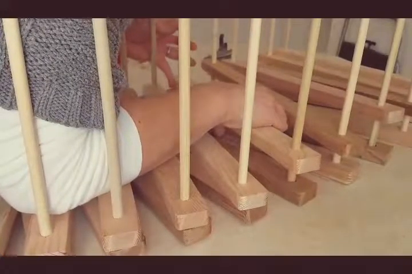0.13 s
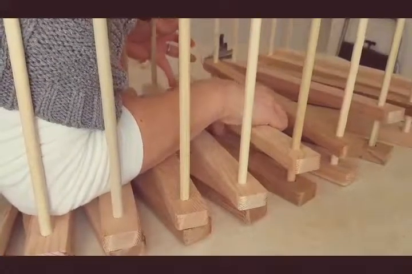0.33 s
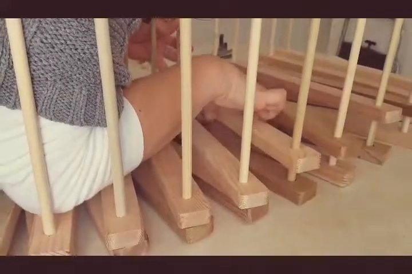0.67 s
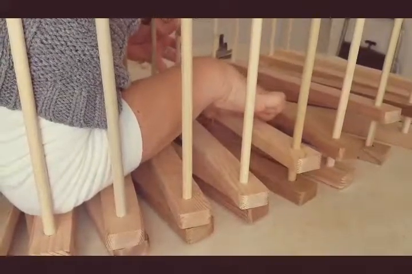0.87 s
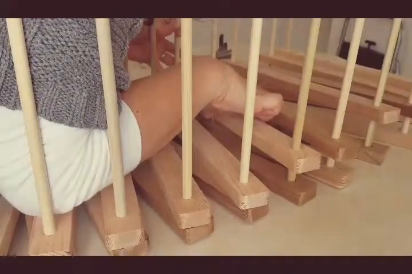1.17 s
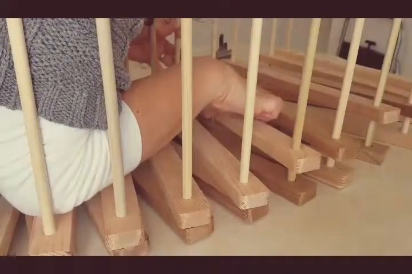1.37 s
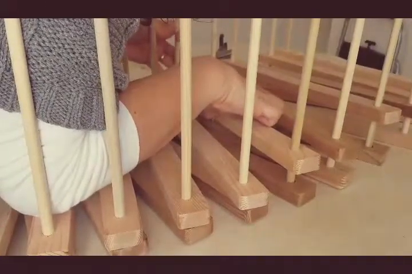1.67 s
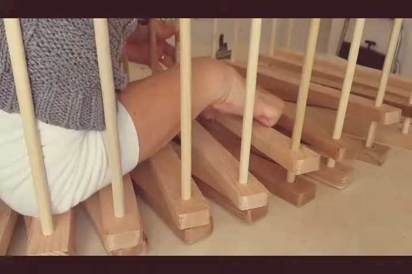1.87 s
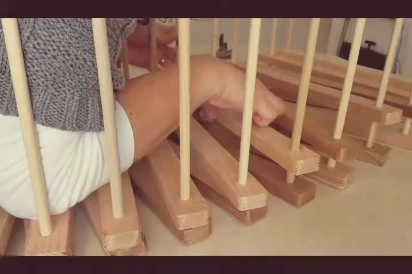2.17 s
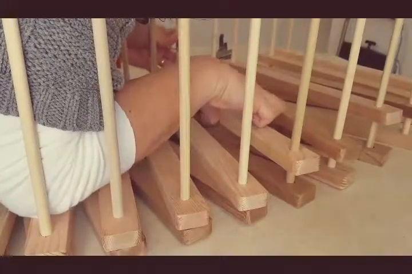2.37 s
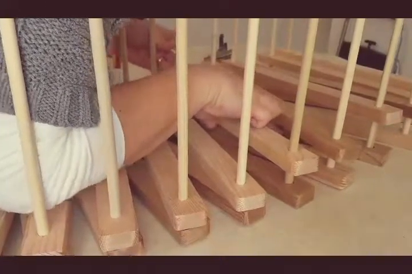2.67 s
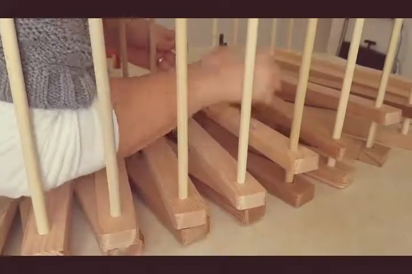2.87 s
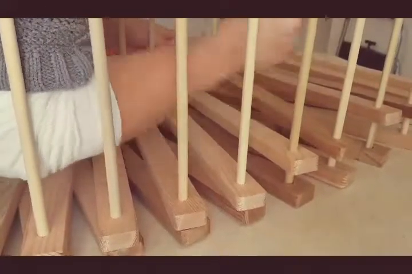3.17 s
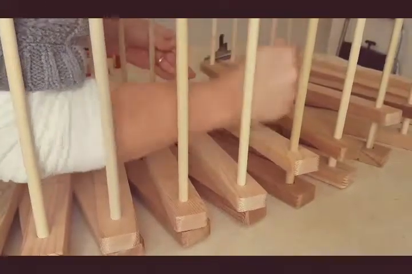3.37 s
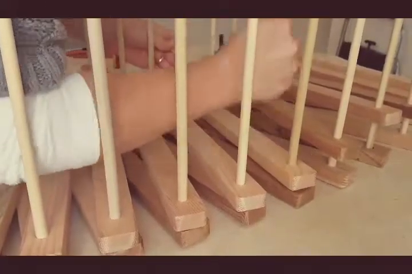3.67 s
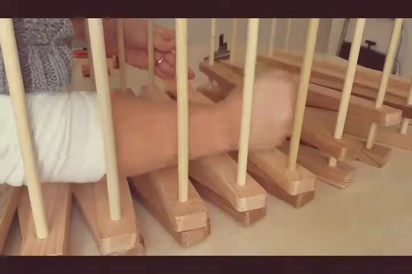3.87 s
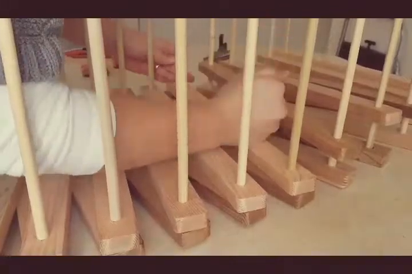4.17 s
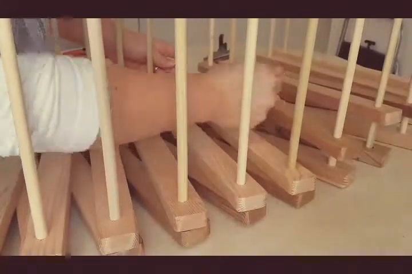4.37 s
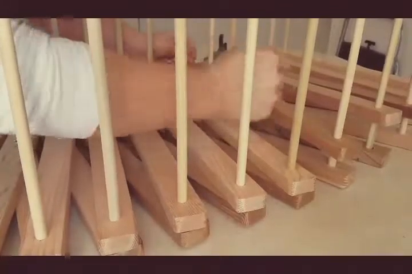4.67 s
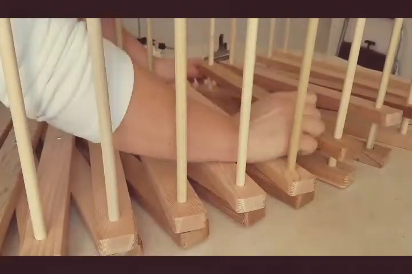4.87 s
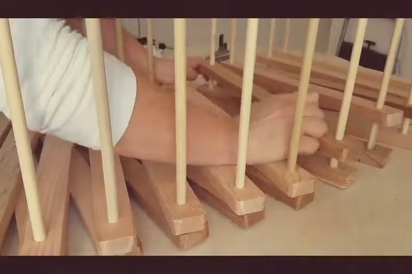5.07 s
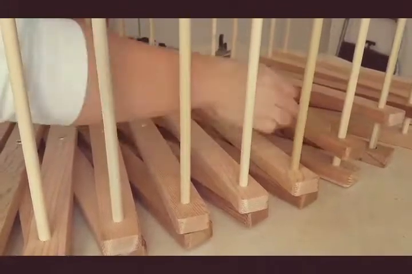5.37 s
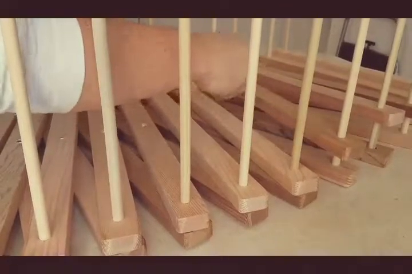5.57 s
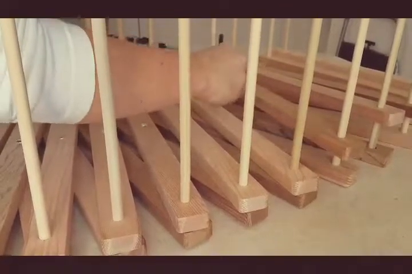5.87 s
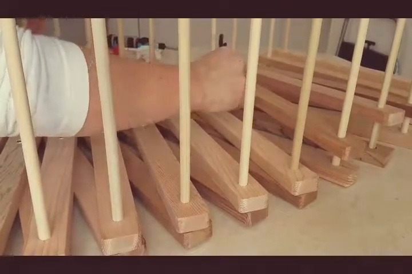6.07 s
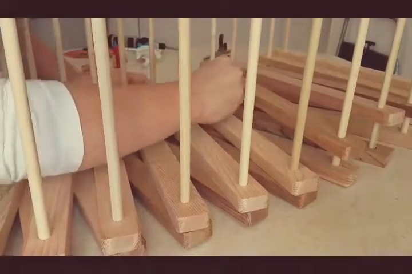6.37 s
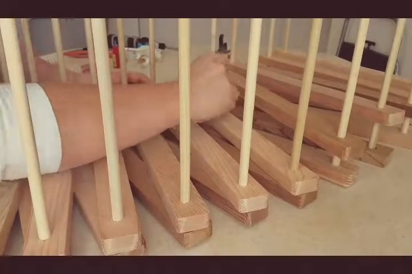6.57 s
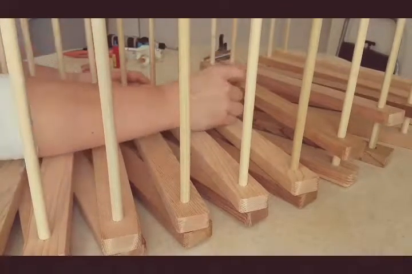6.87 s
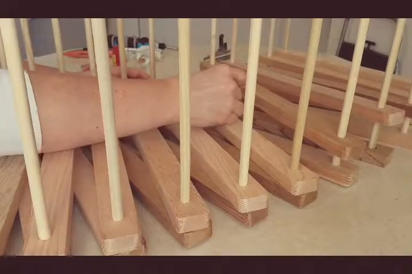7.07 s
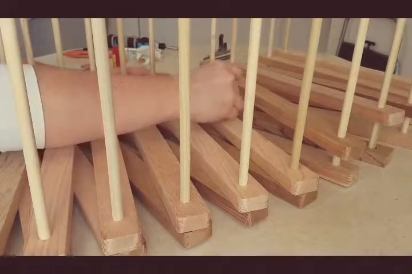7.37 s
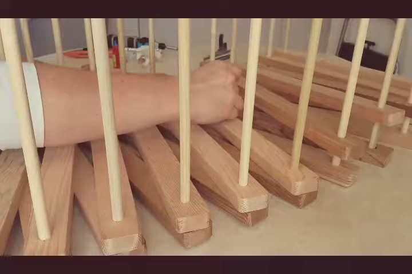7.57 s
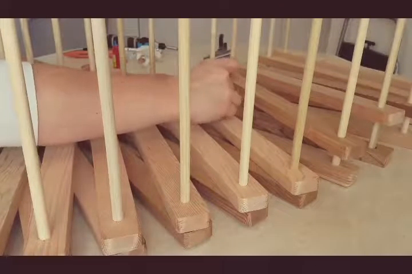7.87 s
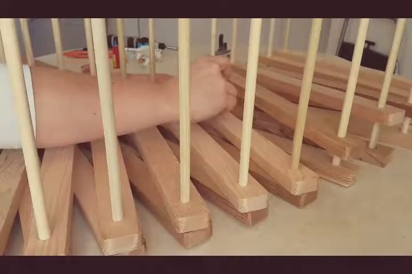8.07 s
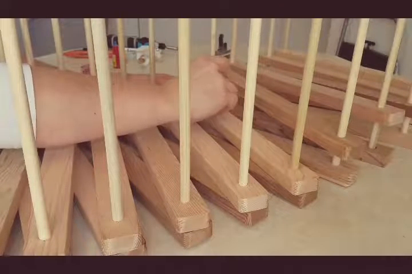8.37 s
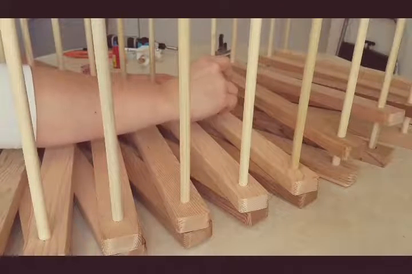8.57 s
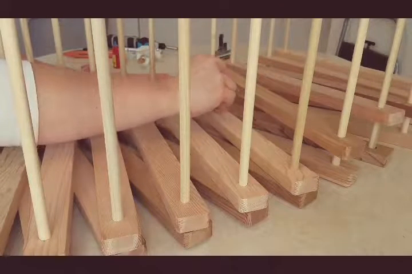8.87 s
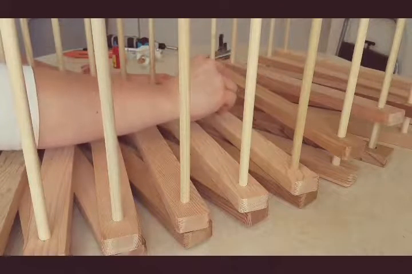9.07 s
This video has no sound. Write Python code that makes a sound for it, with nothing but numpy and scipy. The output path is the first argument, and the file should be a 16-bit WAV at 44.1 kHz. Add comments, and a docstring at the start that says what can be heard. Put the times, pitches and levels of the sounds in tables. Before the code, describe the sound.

Close stereo pickup of a wooden rack on a bench indoors. Quiet handling comes first: small metallic ticks, soft woody knocks, a short dry squeak and a faint sleeve brush. A run of five hard wooden clacks, about a quarter second apart, leaps far above everything else and rings shortly in the room. Afterwards come a muted knock pair, little ticks, a low sliding rub, scuffs and sparse dowel taps over faint hum.

```python
"""Wooden rack on the bench

Metal fittings click, a joint creaks, five arms drop in a run of clacks; light knocks come before and
after the clacks, and taps and a slide come late.
Blows are a bright snap and a noise crack that excite wood or metal modes and dense room reflections.
The creak is a squeak of unsteady sines; hands, sleeve, scuffs and slide are grainy, coloured friction noise.
Underneath lie steady still-air noise and a faint two-tone hum, in a small, live workshop."""
import sys
import numpy as np
from scipy import signal
from scipy.fft import rfft, irfft, next_fast_len
from scipy.io import wavfile
from scipy.ndimage import uniform_filter1d

SR = 44100
rng = np.random.default_rng(int(sys.argv[2]) if len(sys.argv) > 2 else 0)


def wav_record(signal):
    """Record a signal, one row per channel, as 16-bit PCM in the file named by sys.argv[1]."""
    frames = np.transpose(np.atleast_2d(signal))
    bounded = np.clip(frames, -1, 1)
    # unit amplitude maps onto the largest positive 16-bit level
    quanta = np.round(bounded * 32767).astype(np.int16)
    wavfile.write(sys.argv[1], SR, quanta)


N = 406602
TIME = np.arange(N) / SR   # seconds
BLOW_SIZE = 24576          # samples given to each blow and its tail

# Event levels and note levels are mix settings, before the trims that the source functions add.
# Bass, presence, treble, brightness and note are relative to the event's level.
# Arms dropping on the stack: [t/s, level/dB, bass/dB, presence/dB, treble/dB, contact sharpness/dB,
# the part's own note f/Hz, note/dB]
CLACK_EVENTS = [(3.5425, -7, -2.5, -2, -5.5, 6.5, 797, -7.5), (3.8012, -6, -6, -3, -9.5, 6.5, 654, -3.5),
                (4.0248, -7.5, -2, -1.5, -5.5, 4.5, 651, -5.5),
                (4.3088, -9.5, -6.5, 5.5, 4.5, 5, 2235, -11.5),
                (4.6195, -15.5, 1.5, -1.5, -10.5, 3.5, 764, -3)]
# Metal fittings touching: [t/s, level/dB, bass/dB, presence/dB, treble/dB, sharpness/dB, note f/Hz, note/dB]
CLICK_EVENTS = [(0.0354, -51, 8, 7.5, 8, 8, 806, -6), (0.1252, -35.5, 4, -5, -9, 2.5, 2200, -13),
                (0.1541, -51.5, 7, 8, 11.5, 9.5, 627, -4), (0.6345, -42, -16, 3, 11, 6.5, 1184, 1.5),
                (0.7897, -40, -16, 2, 8, 9.5, 1190, 1), (1.0845, -34.5, -7, 0.5, 1, 6.5, 750, -18),
                (1.1624, -36.5, -22, 0.5, -1, 4.5, 1183, -0.5), (1.176, -39, -6, -6, 1, 12, 947, -2),
                (1.2995, -34, -15, -4, -4, 8, 1350, -8.5), (2.0269, -35.5, -18, 3.5, -10.5, 4, 726, -8.5),
                (2.0858, -47, 3, 4, 10, 11.5, 931, 5.5), (2.8999, -32, -22, -3.5, -3.5, 7.5, 958, -8),
                (2.9592, -34, 13.5, 3.5, 6.5, 8, 2290, -7), (3.3334, -36.5, -7, -1, -5, 4.5, 737, -4),
                (5.7105, -39.5, 9.5, 0, -12.5, 8, 1250, -2)]
# Arms bumping lightly together: [t/s, level/dB, bass/dB, brightness/dB, sharpness/dB, the arm's note f/Hz]
KNOCK_EVENTS = [(0.3048, -49.5, 6, 8.5, 5.5, 980), (0.715, -44, -12, 11, 0, 1195),
                (1.2873, -45, -11, 2, 6, 343), (1.328, -38.5, -11, 5.5, 9.5, 747),
                (1.5148, -48, 3.5, 0.5, 5.5, 660), (1.9219, -40.5, -5, -2.5, 2.5, 352),
                (1.98, -42.5, -1, -4.5, 7, 362), (2.06, -38, -8, 7, 4.5, 1760),
                (2.4429, -37, 1.5, -3.5, 4, 335), (2.7282, -36.5, -7.5, -11, 6, 340),
                (2.872, -36.5, -1, -3, 4, 297), (3.058, -32, -2, -2, 5, 636),
                (3.2768, -42.5, 1, 6, 4.5, 2250), (4.613, -32.5, 0, -2, 9.5, 570),
                (5.3352, -23, 0, -12, 5, 842), (5.362, -30.5, 3, -6.5, 5, 624),
                (5.468, -45.5, 2, -2, 9.5, 352), (5.808, -43.5, 7.5, -13, 3, 210)]
# A dowel tapped against an arm: [t/s, level/dB, bass/dB, brightness/dB, sharpness/dB]
TAP_EVENTS = [(5.941, -44, 1, -9, 5), (5.984, -47, 0.5, -4, 3), (7.9, -56, 3, 1, -4.5),
              (8.352, -59, -2, -8, 9), (8.6239, -45.5, -9, 5, 7.5), (8.8172, -48, -15, 6, 4),
              (8.8627, -42, -1, 6, 6), (8.9901, -53, -5, -7.5, 11.5)]
# Spectrum of a clack: [f/Hz, relative level/dB]
CLACK_SPECTRUM = [(40, -23), (65, -15), (95, -6), (130, -4.5), (200, -8), (500, -5.5), (750, -8),
                  (1100, -11.5), (1600, -16), (2300, -19), (3200, -29.5), (5000, -34), (7500, -42.5),
                  (10000, -40.5), (14500, -51.5)]
# Spectrum of a click: [f/Hz, relative level/dB]
CLICK_SPECTRUM = [(50, -16.5), (110, -1), (280, -5.5), (600, -5), (1200, -6.5), (2300, -4.5), (3200, -13),
                  (4200, -13.5), (7000, -22.5), (9500, -14), (14500, -19.5)]
# Spectrum of a knock: [f/Hz, relative level/dB]
KNOCK_SPECTRUM = [(40, -19.5), (70, -9), (115, -4.5), (190, -7.5), (280, 1.5), (450, -20.5), (700, -10.5),
                  (1200, -13), (2300, -18.5), (3500, -30), (7000, -35.5), (14500, -34)]
# Spectrum of a tap: [f/Hz, relative level/dB]
TAP_SPECTRUM = [(50, -4), (120, 2.5), (300, 1.5), (450, -11), (680, -1), (950, -10), (1600, -10),
                (2400, -11.5), (3700, -19.5), (6000, -27.5), (8000, -30.5), (14500, -29.5)]
# Modes of the wooden rack: [f/Hz, relative level/dB, t60/s]
WOOD_MODES = [(94.6, -2.5, .35), (111, 0.5, 0.15), (127.3, 5.5, 0.35), (162, -4.5, 0.32), (205, -4.5, 0.55),
              (261.6, 0, 0.45), (343, -1, 0.26), (379, -9.5, 0.14), (487, -2.5, 0.42), (540, 2, 0.28),
              (640, 0, 0.33), (792, -1, 0.18), (970, -6.5, 0.23), (1294, -14.5, .3), (1737, -16.5, 0.5),
              (1797, -16, 0.47), (2092, -15.5, 0.25), (2208, -15.5, .35), (2380, -15, 0.36)]
# Modes of the metal fittings: [f/Hz, relative level/dB, t60/s]
METAL_MODES = [(1224, -2.5, 0.3), (1790, -4.5, .3), (2347, -2, .3), (2560, -4, .22), (3200, -9.5, .22),
               (3960, -6, .18), (4410, -14, .18), (5550, -16.5, .28), (6770, -13, 0.15), (9000, -14, 0.34),
               (9340, -8, 0.17), (11730, -6.5, 0.1), (13150, -3, .15)]
# Squeaks of a tight joint, mere ticks when the slip is brief: [t/s, length/s, level/dB, pitch f/Hz]
CREAK_EVENTS = [(0.952, .021, -38.5, 761), (.976, .052, -27, 735), (1.026, 0.046, -34.5, 731),
                (1.069, 0.0195, -28, 779), (2.939, .008, -40, 2300), (3.053, 0.0063, -39, 2386),
                (3.276, .006, -42, 2200), (6.012, 0.0052, -42, 319.2), (6.123, .004, -45, 328),
                (6.168, 0.0064, -49.5, 670), (6.225, 0.0062, -51, 300), (6.339, 0.01, -47.5, 326)]
# Partials of the squeak: [multiple of the pitch, relative level/dB]
SQUEAK_PARTIALS = [(.35, -16.5), (1, -2), (1.5, -18.5), (2.2, -35), (2.9, -23)]
# One arm pushed along another: [t/s, length/s, level/dB]
SLIDE_SHOVES = [(6.908, .03, -45.5), (7.012, 0.011, -40.5), (7.09, 0.046, -40.5)]
# Spectrum of the sliding rumble: [f/Hz, relative level/dB]
SLIDE_SPECTRUM = [(30, -15), (76, -31), (128, -8), (160, -12), (193, 0.5), (263, -16.5), (359, -8.5),
                  (465, -12.5), (602, -10.5), (888, -16.5), (1830, -22.5), (4300, -38), (7000, -56),
                  (14500, -60)]
# A hand gripping and shifting the arms: [t/s, length/s, level/dB]
HAND_GRIPS = [(.02, 0.15, -41.5), (.41, 0.079, -48.5), (.565, 0.04, -47), (.65, 0.71, -52.5),
              (1.53, 0.14, -62), (1.96, 0.14, -46), (2.45, 0.45, -52.5), (2.88, 0.26, -42.5),
              (3.28, 0.1, -47), (4.88, 0.19, -53), (5.37, 0.26, -46.5), (5.76, 0.042, -42.5),
              (5.93, 0.32, -59), (7.6, 1.3, -65.5)]
# Spectrum of a hand rubbing along the arms: [f/Hz, relative level/dB]
HAND_SPECTRUM = [(24, -47), (40, -18.5), (80, -9.5), (118, 2), (180, -9.5), (267, -0.5), (416, -18.5),
                 (810, -13), (1060, -22.5), (2340, -25), (3140, -35.5), (14500, -45)]
# Wood scuffing lightly over wood: [t/s, length/s, level/dB]
WOOD_SCUFFS = [(2.71, 0.16, -54.5), (5.3, .03, -49), (7.543, 0.016, -54), (8.06, 0.057, -61.5),
               (8.25, 0.017, -58.5), (8.415, 0.05, -55.5), (8.59, .02, -62)]
# Spectrum of a scuff: [f/Hz, relative level/dB]
SCUFF_SPECTRUM = [(80, -20), (300, 0.5), (450, -3.5), (680, -2.5), (1000, -9), (2400, -9.5), (4000, -19.5),
                  (7000, -34), (14500, -32)]
# A knitted sleeve brushing past the dowels: [t/s, length/s, level/dB]
SLEEVE_BRUSHES = [(2.46, 0.11, -60), (2.9, 0.59, -61), (3.7, 0.074, -58), (5.29, 0.064, -60),
                  (5.7, 0.034, -60.5), (7.79, 0.041, -63)]
# Spectrum of the sleeve, also used for the hiss of the slide: [f/Hz, relative level/dB]
HISS_SPECTRUM = [(100, -21), (1000, -1), (2400, 1), (4000, -2.5), (7000, -8), (9500, -6.5), (14500, -8)]
# Still air of the workshop: [f/Hz, relative level/dB]
AIR_SPECTRUM = [(20, -7.5), (33, -18.5), (80, -17), (130, -9), (190, -14.5), (270, -11.5), (400, -19),
                (520, -16), (950, -20.5), (1500, -23), (2400, -23.5), (4000, -30.5), (7300, -38),
                (9500, -35), (14500, -34.5)]
# Tones of the hum: [f/Hz, rms level/dB]
HUM_TONES = [(124, -73.5), (204.6, -81.5)]
# The room's reflections: [centre f/Hz, t60/s, relative level/dB]
ROOM_BANDS = [(110, .38, 0.5), (258, 0.33, 0.5), (550, 0.36, -0.5), (1090, 0.39, -.5), (2200, .38, -1.5),
              (4200, 0.33, 2), (7000, .32, 2), (13000, .25, 2.5)]
# Left-right likeness at the two microphones: [f/Hz, correlation before limiting to +-0.99]
MIC_LIKENESS = [(120, 1.1), (300, 0.84), (700, 0.73), (1300, -0.0249), (14000, -0.01)]
# Colour difference of the two microphones: [f/Hz, left minus right/dB]
MIC_BALANCE = [(100, -2.5), (600, -2.5), (1100, 0.05), (2200, 2), (8000, .5)]


def clacks():
    """Heavy arms drop on the stack and set the rack's wood ringing."""
    return blows(CLACK_EVENTS, CLACK_SPECTRUM, WOOD_MODES, snap_db=15, tail_db=-1.5, ring_db=-11.5,
                 note_db=-0.5, note_t60=0.13, crack_db=2.5, crack_s=0.00093, build_s=0.0022,
                 spread_db=4.0, ripple_db=2, valley_db=0)


def clicks():
    """Small metal fittings touch and ring in their own higher modes."""
    return blows(CLICK_EVENTS, CLICK_SPECTRUM, METAL_MODES, snap_db=12, tail_db=-1.4, ring_db=-9,
                 note_db=3.5, note_t60=0.2, crack_db=2.0, crack_s=0.0018, build_s=0.0032,
                 spread_db=2.5, ripple_db=4, valley_db=1)


def knocks():
    """Arms bump lightly; each rings its own note, and the treble follows the brightness."""
    events = []
    for start_s, level_db, bass_db, bright_db, sharp_db, note_hz in KNOCK_EVENTS:
        treble_db = bright_db - 5
        events.append((start_s, level_db, bass_db, bright_db, treble_db, sharp_db, note_hz, -5))
    return blows(events, KNOCK_SPECTRUM, WOOD_MODES, snap_db=13.5, tail_db=-2.5, ring_db=-17,
                 note_db=-1.5, note_t60=0.13, crack_db=2.5, crack_s=0.0031, build_s=0.0026,
                 spread_db=4, ripple_db=5, valley_db=-2.5)


def taps():
    """A dowel taps an arm; every tap shares its note, and brightness sets presence and treble."""
    dowel_hz, dowel_db = 638.6, 2
    events = []
    for start_s, level_db, bass_db, bright_db, sharp_db in TAP_EVENTS:
        treble_db = 1.96 * bright_db   # treble swings further than presence
        events.append((start_s, level_db, bass_db, bright_db, treble_db, sharp_db, dowel_hz, dowel_db))
    return blows(events, TAP_SPECTRUM, WOOD_MODES, snap_db=16, tail_db=-1.0, ring_db=-13.5,
                 note_db=5.0, note_t60=0.076, crack_db=2.0, crack_s=0.005, build_s=0.0015,
                 spread_db=3.0, ripple_db=5, valley_db=3.0)


def blows(events, colour, modes, snap_db, tail_db, ring_db, note_db, note_t60, crack_db, crack_s,
          build_s, spread_db, ripple_db, valley_db):
    """Each blow is a short crack, then the part's modes and the room's reflections."""
    out, hz, t = np.zeros((2, N)), bins_hz(BLOW_SIZE), TIME[:BLOW_SIZE]
    body = unit_gain(colour, hz) * modal_emphasis(modes, width_hz=11.0, valley_db=valley_db)
    snap = contact_snap(level_db=snap_db, edge_hz=3200, delay_s=0.0006)
    for start_s, level_db, bass_db, presence_db, treble_db, sharp_db, own_hz, own_db in events:
        tone = [(170, bass_db), (400, 0.01), (800, 0.0),
                (1600, presence_db), (2800, presence_db), (6500, treble_db)]
        # A soft contact swells more slowly
        build = 1 - np.exp(-t / (build_s * from_db(-2 * sharp_db)))
        crack = rms_one(irfft(diffuse(BLOW_SIZE))) * np.exp(-t / crack_s)
        crack = crack * from_db(crack_db + sharp_db)
        tail = from_db(tail_db) * room_tail(swell_cycles=0.81)
        burst = build * (crack + tail) + from_db(sharp_db) * snap
        gain = body * from_db(at_hz(tone, hz)) * contact_ripple(ripple_db, width_hz=76)
        struck = causal_filter(burst, gain)
        shared_ring = from_db(ring_db) * ringing(modes, tone, spread_db)
        own_note = ringing([(own_hz, own_db + note_db, note_t60)], [(own_hz, 0)], 0)
        add(out, start_s, from_db(level_db) * (struck + build * (shared_ring + own_note)))
    return out


def contact_snap(level_db, edge_hz, delay_s):
    """Hard surfaces meeting send one bright spike straight to the microphones."""
    spike = signal.unit_impulse(BLOW_SIZE, int(delay_s * SR))
    treble_only = signal.butter(1, edge_hz, "high", fs=SR, output="sos")
    return from_db(level_db) * signal.sosfilt(treble_only, spike)


def modal_emphasis(modes, width_hz, valley_db):
    """Vibration gathers at the modes and is weak between; power is levelled against its local mean."""
    hz = bins_hz(BLOW_SIZE)
    power = from_db(2 * valley_db)
    for centre_hz, _, _ in modes:
        power = power + 1 / (1 + ((hz - centre_hz) / width_hz) ** 2)
    return np.sqrt(power / uniform_filter1d(power, size=151))


def contact_ripple(depth_db, width_hz):
    """Each point of contact favours some of the part's many upper resonances and misses others."""
    hz = bins_hz(BLOW_SIZE)
    knots_hz = np.arange(600) * width_hz
    ripple = np.interp(hz, knots_hz, rng.standard_normal(len(knots_hz)))
    return rms_one(from_db(depth_db * ripple * hz / (hz + 500)))   # shallow in the bass


def ringing(modes, tone, spread_db):
    """Decaying sines, struck anew in strength; high ones reach the two microphones out of step."""
    hz, db, t60 = np.transpose(modes)
    strength, phase, lag = rng.standard_normal((3, len(hz)))
    apart = lag * np.arccos(np.clip(at_hz(MIC_LIKENESS, hz), 0, 1)) / 2
    gain = from_db(db + at_hz(tone, hz) + spread_db * strength)
    start = gain * np.exp(1j * (np.pi * phase + apart * [[1], [-1]]))
    waves = np.exp(np.outer(2j * np.pi * hz - np.log(1000) / t60, TIME[:BLOW_SIZE]))
    return np.imag(start @ waves)


def room_tail(swell_cycles):
    """Dense reflections: each range of pitch builds over a few cycles and dies at its own rate."""
    field, hz, t = diffuse(BLOW_SIZE), bins_hz(BLOW_SIZE), TIME[:BLOW_SIZE]
    centres_hz = np.array(ROOM_BANDS)[:, 0]
    out = 0
    for one_band, (centre_hz, t60, db) in zip(np.eye(len(ROOM_BANDS)), ROOM_BANDS):
        share = at_hz(np.c_[centres_hz, one_band], hz)   # neighbouring ranges crossfade
        swell = 1 - np.exp(-t * centre_hz / swell_cycles)
        decay = np.exp(-np.log(1000) * t / t60) * swell
        # Each range returns a set share of the blow's energy
        power = np.mean(share ** 2) * np.mean(decay ** 2)
        out = out + from_db(db) * np.sqrt(power) * rms_one(irfft(field * share) * decay)
    return out


def creak(jitter, flutter_db, level_db, room_db):
    """While the joint slips, friction keeps the wood swinging at an unsteady pitch."""
    sound, t = np.zeros((1, N)), TIME[:BLOW_SIZE]
    for start_s, length_s, db, pitch_hz in CREAK_EVENTS:
        waver, grip = rms_one(uniform_filter1d(rng.standard_normal((2, BLOW_SIZE)), size=110))
        phase = 2 * np.pi * np.cumsum(pitch_hz * (1 + jitter * waver)) / SR
        slip = (1 - np.exp(-t / 0.00069)) * np.exp(-np.maximum(t - length_s, 0) / 0.00089)
        swing = sum(from_db(partial_db) * np.sin(k * phase) for k, partial_db in SQUEAK_PARTIALS)
        strength = from_db(db + level_db + flutter_db * grip)
        add(sound, start_s, (strength * slip * swing)[None])
    echoes = rms_one(room_tail(swell_cycles=0.7)) / np.sqrt(BLOW_SIZE)
    return sound + from_db(room_db) * signal.oaconvolve(sound, echoes, axes=1)[:, :N]


def sliding(hiss_growth, hiss_db):
    """Pressing harder sets the arm rumbling; the hiss of the surfaces grows much less."""
    push = strokes(SLIDE_SHOVES, rise_s=0.033, fall_s=0.063)
    rumble = rubbing(push, SLIDE_SPECTRUM, level_db=0, grain_db=1.9, grain_s=0.0044)
    hiss = rubbing(push ** hiss_growth, HISS_SPECTRUM, level_db=hiss_db, grain_db=1.5, grain_s=0.004)
    return rumble + hiss


def handling():
    """A hand grips and shifts the arms, rubbing in low, coarse grains."""
    grip = strokes(HAND_GRIPS, rise_s=0.034, fall_s=0.063)
    return rubbing(grip, HAND_SPECTRUM, level_db=-2.5, grain_db=5.0, grain_s=0.037)


def scuffing():
    """Wood scuffs lightly over wood with a quick onset and fine grain."""
    scuff = strokes(WOOD_SCUFFS, rise_s=0.0069, fall_s=0.049)
    return rubbing(scuff, SCUFF_SPECTRUM, level_db=1, grain_db=2.5, grain_s=0.0065)


def sleeve_brushing():
    """Knitted cloth brushes past the dowels as soft, nearly even friction noise."""
    brush = strokes(SLEEVE_BRUSHES, rise_s=0.041, fall_s=0.06)
    return rubbing(brush, HISS_SPECTRUM, level_db=-0.5, grain_db=-0.5, grain_s=0.008)


def strokes(events, rise_s, fall_s):
    """Strength of a run of strokes: each swells, holds for its length and dies away."""
    power = 0
    for start_s, length_s, db in events:
        before = np.maximum(start_s - TIME, 0) / rise_s   # the swell leads up to the start
        after = np.maximum(TIME - start_s - length_s, 0) / fall_s
        power = power + (from_db(db) * np.exp(-np.minimum(before + after, 20))) ** 2
    return np.sqrt(power)


def rubbing(strength, colour, level_db, grain_db, grain_s):
    """Friction noise that follows the strength of the stroke."""
    return from_db(level_db) * strength * coloured_noise(colour, grain_db, grain_s)


def coloured_noise(colour, grain_db, grain_s):
    """Noise of rms 1 whose strength catches and slips in short grains."""
    size = next_fast_len(N, True)
    grip = rms_one(uniform_filter1d(rng.standard_normal(size), max(int(grain_s * SR), 1)))
    grains = irfft(diffuse(size), size) * from_db(grain_db * grip)
    coloured = irfft(rfft(grains) * unit_gain(colour, bins_hz(size)), size)
    return rms_one(coloured[:, :N])


def workshop():
    """Still air as steady coloured noise, with a faint hum of pure tones."""
    hum = sum(from_db(db) * np.sqrt(2) * np.sin(2 * np.pi * hz * TIME) for hz, db in HUM_TONES)
    air_db = -63.5   # rms
    return hum + from_db(air_db) * coloured_noise(AIR_SPECTRUM, grain_db=0.5, grain_s=0.03)


def diffuse(size):
    """Spectrum of white noise at two microphones: alike in the bass, unrelated in the treble."""
    alike = np.clip(at_hz(MIC_LIKENESS, bins_hz(size)), -0.99, 0.99)
    mid, side = rfft(rng.standard_normal((2, size)))
    return np.sqrt((1 + alike) / 2) * mid + np.sqrt((1 - alike) / 2) * side * [[1], [-1]]


def causal_filter(x, gain):
    """Minimum-phase filter: nothing sounds before its cause."""
    cepstrum = irfft(np.log(gain + 1e-9))
    half = len(cepstrum) // 2
    # Fold the time-reversed half onto the forward half
    cepstrum[1:half] *= 2
    cepstrum[half + 1:] = 0
    return irfft(rfft(x) * np.exp(rfft(cepstrum)))


def unit_gain(colour, hz):
    """Gain of a spectrum, scaled to pass unit power."""
    return rms_one(from_db(at_hz(colour, hz)))


def at_hz(points, hz):
    """Read a table on a log-frequency axis."""
    known_hz, values = np.transpose(points)
    return np.interp(np.log(hz + 1e-3), np.log(known_hz), values)


def bins_hz(size):
    """Frequencies of the spectrum's bins."""
    return np.arange(size // 2 + 1) * SR / size


def from_db(db):
    """Decibels to amplitude."""
    return 10 ** (np.asarray(db) / 20)


def rms_one(x):
    """Scale to an rms of 1."""
    return x / np.sqrt(np.mean(x ** 2) + 1e-20)


def add(out, start_s, sound):
    """Mix a sound in at its time."""
    i = max(round(start_s * SR), 0)
    out[:, i:i + sound.shape[1]] += sound[:, :N - i]


def scene():
    """All parts on the bench, in the room."""
    struck = clacks() + clicks() + taps() + knocks()
    joint = creak(jitter=0.129, flutter_db=4.0, level_db=-1.0, room_db=-2.5)
    rubbed = handling() + scuffing() + sleeve_brushing()
    slide = sliding(hiss_growth=0.45, hiss_db=-41)
    return struck + joint + rubbed + slide + workshop()


def record(dry):
    """The two microphones differ a little in colour; rumble is thinned, peaks are rounded, the top is cut."""
    size = next_fast_len(N + BLOW_SIZE, True)
    lean = from_db(at_hz(MIC_BALANCE, bins_hz(size)) / 2 * np.array([[1], [-1]]))
    heard = irfft(rfft(dry, size) * lean, size)[:, :N]
    heard = signal.sosfilt(signal.butter(1, 55, "high", fs=SR, output="sos"), heard)
    heard = heard / (1 + (heard / 0.93) ** 6) ** (1 / 6)   # peaks level off towards 0.93
    top_cut = signal.ellip(12, 0.2, 80, 15000, fs=SR, output="sos")
    return signal.sosfilt(top_cut, heard)


dry = scene()
out = record(dry)
wav_record(out)
```